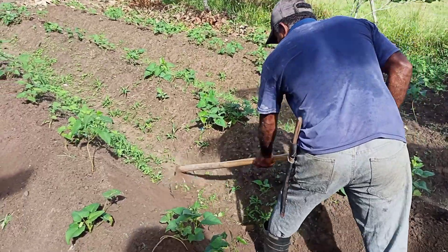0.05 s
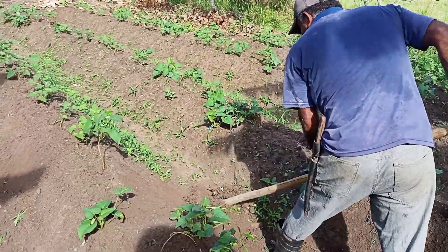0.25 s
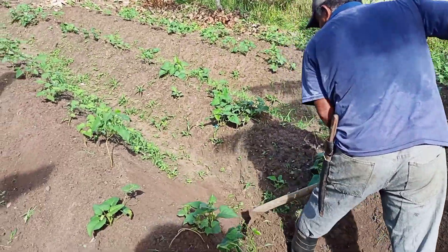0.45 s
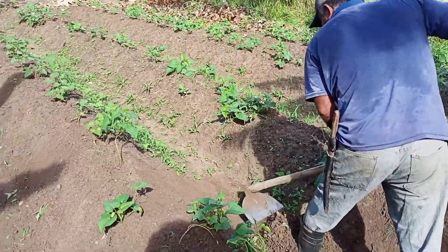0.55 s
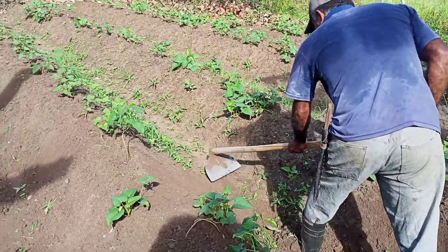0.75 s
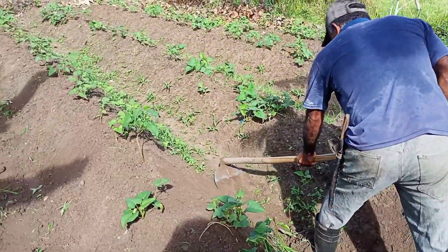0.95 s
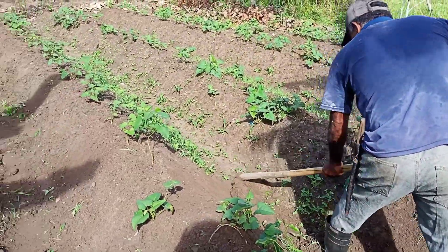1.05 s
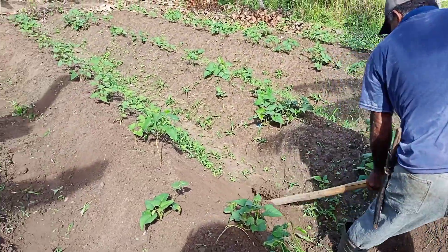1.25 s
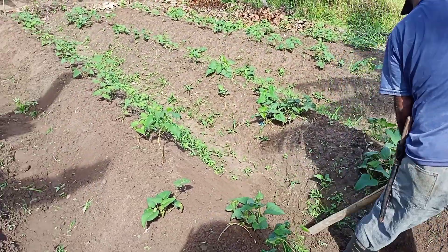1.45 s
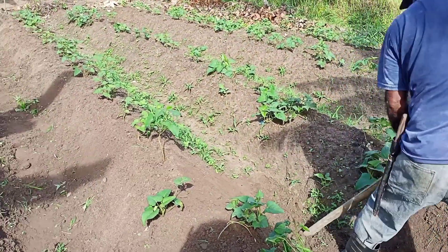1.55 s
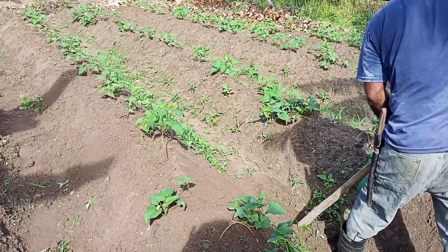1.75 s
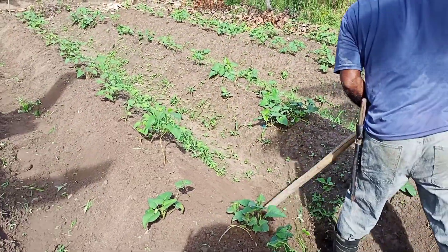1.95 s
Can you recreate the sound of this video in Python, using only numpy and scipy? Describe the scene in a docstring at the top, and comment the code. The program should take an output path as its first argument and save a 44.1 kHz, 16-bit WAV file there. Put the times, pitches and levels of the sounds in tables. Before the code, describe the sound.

A hoe blade rasps through dry soil, cracking loudly on stones, then loose earth trickles; a second, longer rattling scrape follows and stops. Quiet open field with faint insects, close mono microphone overloading on the loudest cracks.

```python
"""Two rattling scrapes of a hoe dragged through dry soil, with sharp cracks and a loose trickle after the first.
Shaped noise, roughened by grit, is the damped steel blade; noise bursts rung at a pitch are stones and clods
cracking on it, and sagging sines are its bites into clods. Insects far off are pulsed narrow-band noise; the open
field is soft noise, a low rumble that comes and goes, and thumps. Bright ticks come late, close by. The loudest
cracks overload the microphone."""
import sys
import numpy as np
from scipy import signal
from scipy.fft import rfft, irfft, next_fast_len
from scipy.io import wavfile
from scipy.ndimage import uniform_filter1d, map_coordinates

SR = 44100
rng = np.random.default_rng(int(sys.argv[2]) if len(sys.argv) > 2 else 0)


def dump(signal):
    """Clip the signal to [-1, 1] and save it as 16-bit WAV at the path in sys.argv[1]."""
    limited = np.clip(np.atleast_2d(signal).T, -1, 1)
    pcm = np.round(limited * 32767).astype(np.int16)
    wavfile.write(sys.argv[1], SR, pcm)


N = 88200

# Blade in the soil. Each row: time in seconds, gain of the middle band in dB, then gain over it in dB of
# the low thud of earth, of the treble and of the topmost hiss.
DRAG_LEVELS = [(0, -56, 18, 3, 0), (.018, -50, 6.5, 20.5, 12), (.034, -33, 1.5, 8.5, 17),
               (.07, -27.5, 0.5, 10, 16), (.1, -31, 2.5, 7.5, 10), (.122, -23.5, 3.5, 8, 2),
               (.15, -28, -2, 6.5, 5), (.2, -14, -10, 5, -20), (.24, -31, -0.5, 8, 11),
               (.295, -31.5, -8.5, 1.5, 7), (.328, -25, -4.5, 7, 0), (.37, -34, -5, 0.5, -2),
               (.41, -47, -17, 9.5, 15), (.46, -45, 7.5, 9, 13), (.545, -47.5, 12.5, 6.5, 11),
               (.62, -50, 11, 10.5, 16), (.74, -58.5, 11, 15, 20), (.8, -57.5, 11.5, 0, -5),
               (.9, -69, 11, -4, -3), (.907, -50, -4.5, 2, 3), (.916, -40, 3, 12.5, 23),
               (.945, -37.5, -2, 7.5, 17), (.98, -30, 4, 11, 18), (1.04, -27, -4.5, 7.5, 13),
               (1.09, -25, -2.5, 5, -7), (1.15, -32, 5, 4, 0), (1.24, -31.5, -1.5, 1.5, 0),
               (1.29, -26, 0.5, 6, 4), (1.34, -25.5, 3.5, 3, 8), (1.405, -31, 4.5, 5, 8),
               (1.43, -28.5, -0.5, 2, 8), (1.47, -30, -5.5, 1, -13), (1.515, -45, -2.5, 1, -5),
               (1.56, -58, 10, 6, 8), (1.7, -58.5, 5.5, -9, 3), (2, -64.5, -1.5, 4.5, 5)]
# Spectrum of sliding soil. Each row: frequency in Hz, relative density in dB per Hz.
SOIL_SPECTRUM = [(35, -43.5), (60, -1), (226, -5.5), (586, -8), (690, 1), (1050, -7), (1210, -4),
                 (1560, -3), (1960, -1), (2920, -3.5), (4230, -22.5), (7060, -32.5), (10000, -44.5),
                 (13500, -41), (15600, -36)]
# Resonances of the blade. Each row: frequency in Hz, width in Hz, lift in dB.
BLADE_MODES = [(310, 57, 5), (720, 80, -3), (1048, 90, 7.5), (2120, 130, 3.5), (2790, 50, 1),
               (3700, 150, 5), (4640, 100, -4.5), (5760, 74, 7), (6940, 86, 6)]
# Spectrum of the far air. Each row: frequency in Hz, relative density in dB per Hz.
FIELD_SPECTRUM = [(40, -22), (75, 0.5), (120, -4.5), (220, -9), (410, -16.5), (700, -17.5), (2100, -17),
                  (3200, -16.5), (5000, -30), (7200, -30.5), (7700, -39), (10000, -37.5), (11500, -46),
                  (13500, -35.5), (15600, -30.5)]
# Low rumble. Each row: time in seconds, level in dB.
RUMBLE_LEVELS = [(0, -66), (.1, -50), (.6, -59.5), (.9, -71), (1.12, -56), (1.5, -58), (1.9, -65.5),
                 (2, -56.5)]
# Soft low thumps in the ground. Each row: centre in seconds, envelope peak in dB, half length in seconds.
GROUND_THUMPS = [(0.296, -40, 0.061), (0.745, -43.5, 0.054), (1.192, -42, .06)]
# Wing tones of the two insects. Each row: frequency in Hz, width per resonance stage in Hz, relative gain in dB.
WING_TONES_A = [(5390, 150, 0), (5710, 150, 0)]
WING_TONES_B = [(6970, 250, 0)]
# Loudness of the two insects. Each row: time in seconds, level in dB.
INSECT_LEVELS_A = [(0, -66), (.4, -67), (.55, -59.5), (.68, -79), (.8, -92.5), (1.65, -85), (1.78, -72.5),
                   (1.85, -67), (2, -62.5)]
INSECT_LEVELS_B = [(0, -82), (.5, -70), (.8, -87), (1.55, -81), (2, -77)]
# Stones and clods cracking on the blade. Each row: start in seconds, peak of the body in dB, pitch in Hz,
# length in seconds, treble edge over the body in dB, handle knock over the body in dB.
CRACK_EVENTS = [(.0722, -12, 2360, 0.0044, -26, -49), (.0765, -27, 2540, 0.0052, -2, -40),
                (0.114, -26, 1180, 0.0015, 0, -40), (.124, -29, 2160, 0.0036, -25, -42),
                (.157, -1.5, 2040, 0.0011, -9, -32), (0.1586, -11, 2860, 0.00062, -1.5, -45),
                (0.1614, -13, 2600, .002, -10, -40), (0.1724, -2.5, 1940, 0.0024, -14, -45),
                (0.1743, -0.5, 2510, 0.0027, -4, -38), (0.176, -10.5, 2300, .002, -7, -12.5),
                (.1835, -5, 2040, 0.0013, -6.5, -24.5), (.193, -1, 2250, .001, -33, -38),
                (.195, -4, 2300, 0.00081, -29.5, -39), (.1972, 2, 1800, .0025, -13.5, -43),
                (.2005, -12.5, 750, 0.0083, -38, -40.5), (.2083, -5.5, 2400, 0.0014, -28, -38.5),
                (.319, -18, 2140, 0.012, -28, -45), (0.328, -24, 2180, 0.011, -27, -34),
                (.451, -39, 1160, 0.0028, -33, -14), (.461, -32.5, 1170, 0.0043, -33, -23),
                (0.482, -34, 1130, 0.0018, -30, -18), (0.509, -37.5, 990, .003, -36, -5),
                (.534, -45, 5460, 0.006, -20, -40), (0.537, -33.5, 1005, 0.013, -30, -2.5),
                (0.558, -36, 1320, 0.0073, -30, 1.5), (0.574, -46, 880, 0.0058, -30, 4),
                (.9567, -22, 756, 0.0099, -6.5, -1.5), (.9625, -18.5, 2450, .005, -22, -10),
                (1.0615, -11, 2050, 0.0014, -10, -40), (1.069, -19, 2310, 0.01, -14, -40),
                (1.1, -38, 1480, 0.00085, -20, -40), (1.261, -31.5, 1760, 0.0023, -30, 8.5),
                (1.2755, -13.5, 2600, 0.0026, -33, -9.5), (1.3124, -15.5, 2100, 0.0038, -28, -43),
                (1.3128, -14, 3000, 0.005, -24, -42), (1.361, -9.5, 2060, 0.0052, -38, -38),
                (1.3648, -6.5, 2200, 0.0058, -45, -22), (1.3735, -9.5, 1950, .004, -40, -13.5),
                (1.4165, -23, 1520, 0.0011, -28, -40), (1.438, -21.5, 2580, 0.0032, -31, -40),
                (1.451, -35, 1230, 0.0018, -28, -40), (1.529, -32, 1800, 0.0054, -28, -44),
                (1.537, -35.5, 2080, 0.0061, -17, -47)]
# Treble edge of a crack. Each row: frequency in Hz, relative density in dB per Hz.
EDGE_SPECTRUM = [(2000, -20.5), (3000, -13), (4500, -4.5), (7000, -15), (9300, -43.5), (11000, -15.5),
                 (12000, -37), (13000, -24.5), (15600, -37)]
# The blade bites into a clod. Each row: start in seconds, peak in dB.
CLOD_THUDS = [(.1835, -27.5), (0.9565, -37), (1.3737, -17.5)]
# Tiny bright ticks close by. Each row: time in seconds, approximate peak in dB.
TICK_EVENTS = [(1.7853, -52), (1.8562, -50), (1.8724, -70), (1.8991, -66.5)]

LOW_EDGE_HZ, HIGH_EDGE_HZ, TOPMOST_EDGE_HZ = 559, 4300, 12300  # band edges of thud, treble and hiss
GRIT_PER_S, GRIT_SPREAD_DB, GRIT_DECAY_S, GRIT_DB = 700, 3, .0015, -6
LUMPY_DB, LUMPS_PER_S, PATCHY_DB, SOIL_LOW_HZ = .5, 34.6, 1.4, 110
FIELD_DB, FIELD_DRIFT_DB, FIELD_PATCHY_DB = -59.5, .8, 1.5
RUMBLE_HZ, RUMBLE_STAGE_WIDTH_HZ, THUMP_HZ = 80, 30, 54
PULSE_A_HZ, PULSE_B_HZ, PULSE_DEPTH = 59, 48, .35
CRACK_STAGE_Q, CRACK_ATTACK_S, CRACK_T60_S = 1.6, .0004, .006
EDGE_DELAY_S, EDGE_T60_S = .00053, .004
HANDLE_HZ, HANDLE_T60_S, HANDLE_ATTACK_S = 285, .08, .003
THUD_FROM_HZ, THUD_TO_HZ, THUD_SAG_S, THUD_T60_S, THUD_ATTACK_S = 750, 150, .006, .07, .001
TICK_HZ, TICK_WIDTH_HZ, TICK_MAKEUP_DB = 13500, 4000, 6.5
CEILING, KNEE = 1.02, 6
LOW_CUT_STAGE_HZ, TOP_HZ, TOP_SLOPE_HZ = 40, 15650, 250


def amp(db):
    """Amplitude ratio of a level in dB."""
    return 10 ** (np.asarray(db) / 20)


def unit(x):
    """x scaled to an RMS of 1."""
    return x / np.sqrt(np.mean(x ** 2) + 1e-20)


def along(points, hz):
    """Interpolate (Hz, value) points on a log frequency axis."""
    point_hz, values = np.transpose(points)
    return np.interp(np.log(hz + 1), np.log(point_hz + 1), values)


def curves(rows):
    """One value per sample for each column after the time."""
    times_s, *columns = np.transpose(rows)
    return [np.interp(np.arange(N) / SR, times_s, column) for column in columns]


def wobble(knots_per_s):
    """A smooth random curve through normally distributed knots."""
    return map_coordinates(rng.standard_normal(1000), [np.arange(N) * knots_per_s / SR])


def filtered(x, response):
    """Filter x by a response given as a function of frequency in Hz."""
    size = next_fast_len(len(x) + 4096)
    spectrum = rfft(x, size) * response(np.fft.rfftfreq(size, 1 / SR))
    return irfft(spectrum, size)[:len(x)]


def peak(f, hz, width_hz):
    """Response of a causal resonance, 1 at its centre."""
    return 1j * f * width_hz / (hz * hz - f * f + 1j * f * width_hz)


def patches(x, depth_db):
    """Random gain in small patches of time and frequency, depth_db RMS."""
    spectrum = signal.stft(x, nperseg=256)[2]
    field = rng.standard_normal(spectrum.shape)
    field = uniform_filter1d(field, size=3, axis=0)  # over frequency
    field = uniform_filter1d(field, size=8, axis=1)  # over time
    return signal.istft(spectrum * amp(depth_db * unit(field)), nperseg=256)[1][:N]


def grit_strikes():
    """Grains strike at random with uneven strength, each dying away exponentially."""
    chance, strength = rng.random((2, N))
    strikes = (chance < GRIT_PER_S / SR) * amp(-GRIT_SPREAD_DB * np.log(strength + .04))
    decay = np.exp(-np.arange(400) / SR / GRIT_DECAY_S)
    return np.convolve(strikes, decay)[:N]


def soil_on_blade(f):
    """Spectrum of sliding soil lifted at the blade's damped resonances, with the deep bass cut."""
    lift_db = sum(db * abs(peak(f, hz, width_hz)) ** 2 for hz, width_hz, db in BLADE_MODES)
    bass_cut = 1 + (SOIL_LOW_HZ / (f + 1)) ** 4
    return amp(along(SOIL_SPECTRUM, f) + lift_db) / bass_cut


def drag():
    """Grit and sliding sand excite the blade; low earth, treble and hiss follow their own levels."""
    mid_db, low_db, high_db, top_db = curves(DRAG_LEVELS)
    grit = unit(grit_strikes())
    rub = rng.standard_normal(N) * (1 + amp(GRIT_DB) * grit)
    rub = patches(rub, PATCHY_DB) * amp(LUMPY_DB * wobble(LUMPS_PER_S))
    rub = unit(filtered(rub, soil_on_blade))

    def below(edge_hz):
        return filtered(rub, lambda f: 1 / (1 + (f / edge_hz) ** 10))

    to_low, to_mid, to_high = below(LOW_EDGE_HZ), below(HIGH_EDGE_HZ), below(TOPMOST_EDGE_HZ)
    thud = amp(low_db) * to_low
    middle = to_mid - to_low
    treble = amp(high_db) * (to_high - to_mid)
    hiss = amp(top_db) * (rub - to_high)
    return amp(mid_db) * (thud + middle + treble + hiss)


def rumble():
    """Noise through two equal low resonances, with its own level curve."""
    low = filtered(rng.standard_normal(N), lambda f: peak(f, RUMBLE_HZ, RUMBLE_STAGE_WIDTH_HZ) ** 2)
    return amp(curves(RUMBLE_LEVELS)[0]) * unit(low)


def air():
    """Broad noise of the far field, slowly drifting in level, over the rumble."""
    far = patches(rng.standard_normal(N), FIELD_PATCHY_DB)
    far = unit(filtered(far, lambda f: amp(along(FIELD_SPECTRUM, f))))
    low = rumble()
    return amp(FIELD_DB + FIELD_DRIFT_DB * wobble(2.1)) * far + low


def insect(tones, pulse_hz, levels):
    """Noise in narrow wing tones, pulsed at a slightly uneven rate."""
    buzz = filtered(rng.standard_normal(N),
                    lambda f: sum(amp(db) * peak(f, hz, width_hz) ** 2 for hz, width_hz, db in tones))
    uneven_hz = pulse_hz * (1 + .05 * wobble(9))
    pulse = 1 + PULSE_DEPTH * np.cos(2 * np.pi * np.cumsum(uneven_hz) / SR)
    return amp(curves(levels)[0]) * unit(buzz * pulse)


def burst(t, length_s, t60_s):
    """Envelope of breaking: quick linear attack, hold until length_s, exponential decay."""
    attack = np.clip(t / CRACK_ATTACK_S, 0, 1)
    return attack * amp(-60 * np.clip(t - length_s, 0, None) / t60_s)


def cracks():
    """Each crack is a burst of breaking rung at its pitch, a sharp edge and a knock in the wooden handle."""
    out, t = np.zeros(N + SR), np.arange(SR // 10) / SR
    handle = np.sin(2 * np.pi * HANDLE_HZ * t) * amp(-60 * t / HANDLE_T60_S)
    handle = handle * np.clip(t / HANDLE_ATTACK_S, 0, 1)
    for start_s, db, hz, length_s, edge_db, handle_db in CRACK_EVENTS:
        body_noise, edge_noise = rng.standard_normal((2, len(t)))
        body = burst(t, length_s, CRACK_T60_S) * body_noise
        body = filtered(body, lambda f: peak(f, hz, hz / CRACK_STAGE_Q) ** 4)  # four equal stages
        body = body / abs(body).max()
        edge = filtered(edge_noise, lambda f: amp(along(EDGE_SPECTRUM, f)))
        edge = burst(t - EDGE_DELAY_S, length_s / 2, EDGE_T60_S) * edge
        edge = edge / abs(edge).max()
        crack = body + amp(edge_db) * edge + amp(handle_db) * handle
        out[round(start_s * SR):][:len(t)] += amp(db) * crack
    return out[:N]


def clod_thuds():
    """Decaying sines whose pitch sags as the earth gives."""
    out, t = np.zeros(N + SR), np.arange(SR // 10) / SR
    pitch_hz = THUD_TO_HZ + (THUD_FROM_HZ - THUD_TO_HZ) * np.exp(-t / THUD_SAG_S)
    tone = np.sin(2 * np.pi * np.cumsum(pitch_hz) / SR)
    attack = np.clip(t / THUD_ATTACK_S, 0, 1)
    for start_s, db in CLOD_THUDS:
        out[round(start_s * SR):][:len(t)] += amp(db - 60 * t / THUD_T60_S) * tone * attack
    return out[:N]


def ground_thumps():
    """Low sines under bell-shaped envelopes."""
    out, t = np.zeros(N), np.arange(N) / SR
    for centre_s, db, half_s in GROUND_THUMPS:
        envelope = amp(db) * np.exp(-((t - centre_s) / half_s) ** 2)
        out += envelope * np.sin(2 * np.pi * THUMP_HZ * (t - centre_s))
    return out


def ticks():
    """Single impulses ring one broad, very high resonance."""
    impulses = np.zeros(N)
    for time_s, db in TICK_EVENTS:
        impulses[round(time_s * SR)] = amp(db + TICK_MAKEUP_DB)  # makes up for the filter's loss
    return filtered(impulses, lambda f: peak(f, TICK_HZ, TICK_WIDTH_HZ))


def scene():
    """Hoe, insects and field, in mono."""
    hoe = drag() + cracks() + clod_thuds()
    insects = insect(WING_TONES_A, PULSE_A_HZ, INSECT_LEVELS_A) + insect(WING_TONES_B, PULSE_B_HZ, INSECT_LEVELS_B)
    field = air() + ground_thumps()
    return (hoe + insects + field + ticks())[None]


def record(dry):
    """The input drops the deepest bass, clips softly and keeps nothing above its band limit."""
    x = filtered(dry[0], lambda f: (1j * f / (LOW_CUT_STAGE_HZ + 1j * f)) ** 3)  # three equal stages
    x = x / (1 + abs(x / CEILING) ** KNEE) ** (1 / KNEE)
    return filtered(x, lambda f: np.clip((TOP_HZ - f) / TOP_SLOPE_HZ, 0, 1))[None]


dry = scene()
out = record(dry)
dump(out)
```